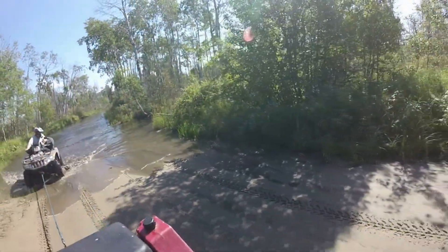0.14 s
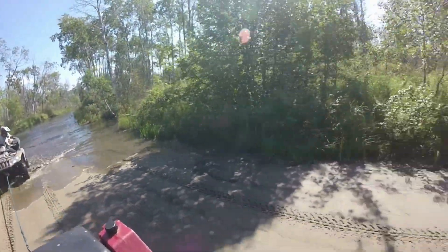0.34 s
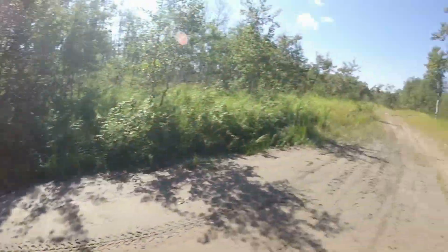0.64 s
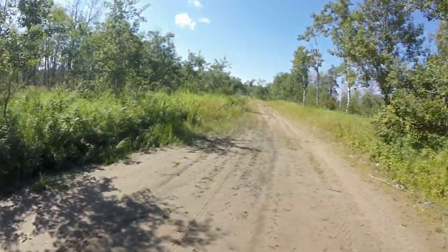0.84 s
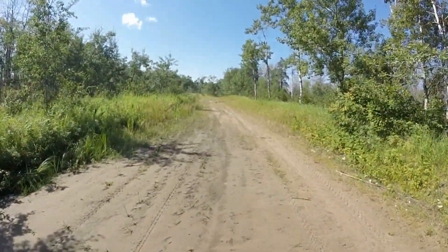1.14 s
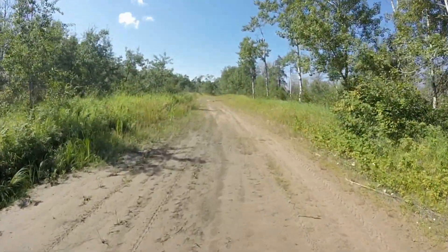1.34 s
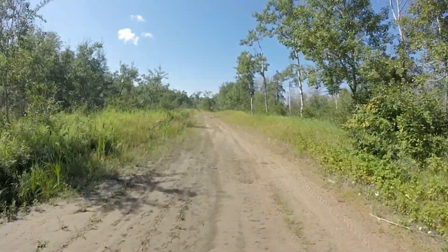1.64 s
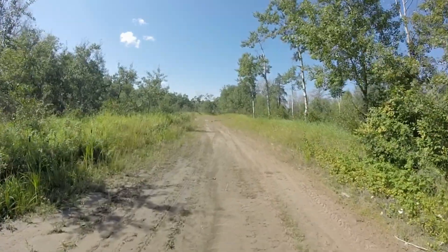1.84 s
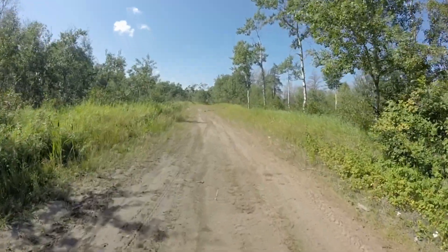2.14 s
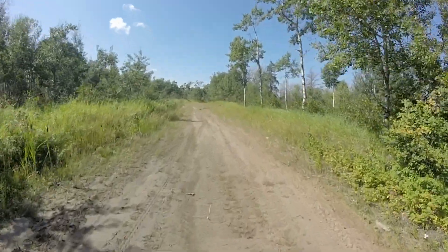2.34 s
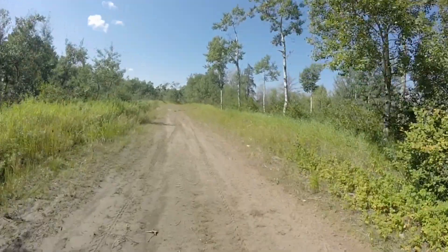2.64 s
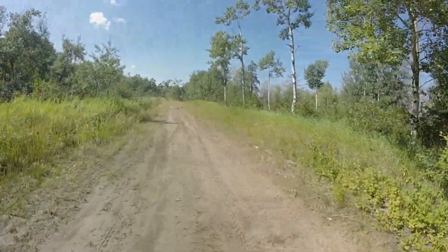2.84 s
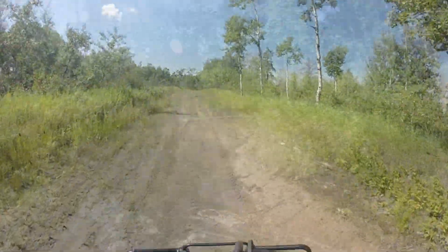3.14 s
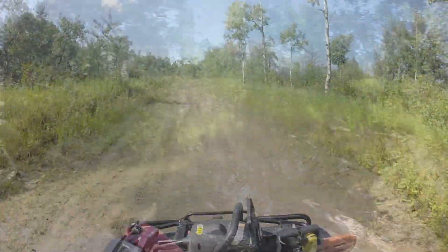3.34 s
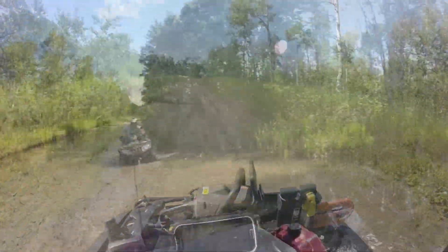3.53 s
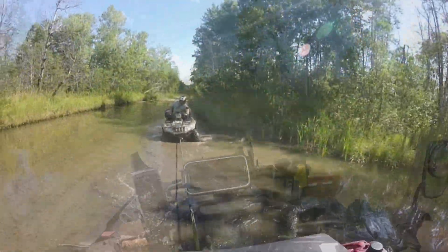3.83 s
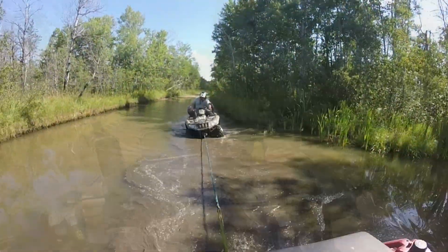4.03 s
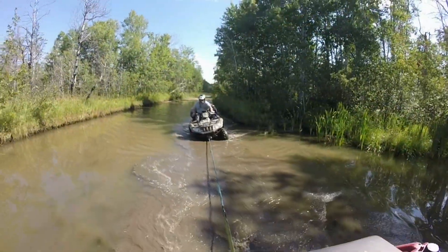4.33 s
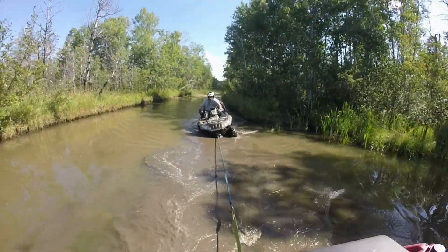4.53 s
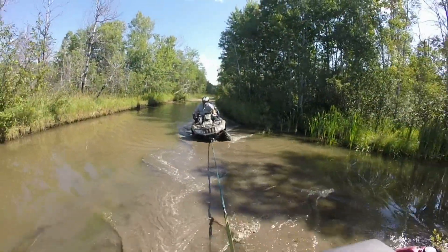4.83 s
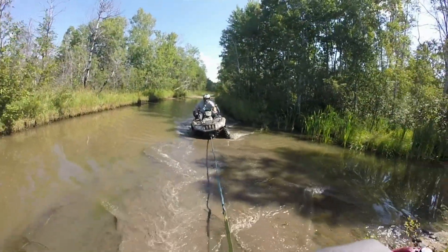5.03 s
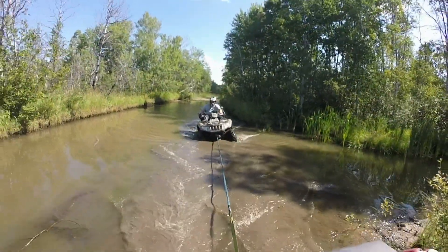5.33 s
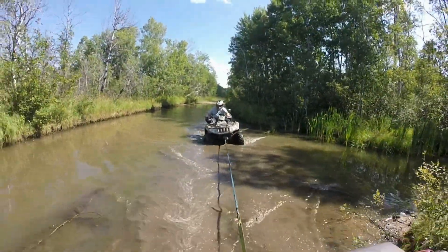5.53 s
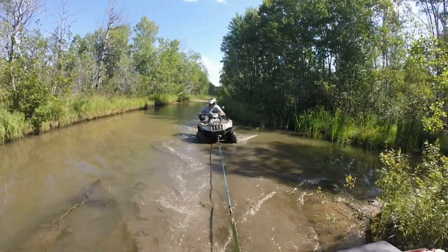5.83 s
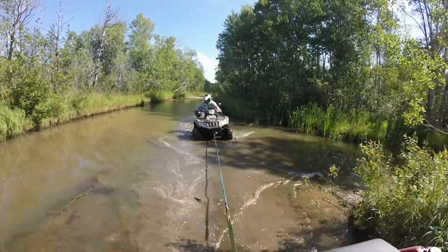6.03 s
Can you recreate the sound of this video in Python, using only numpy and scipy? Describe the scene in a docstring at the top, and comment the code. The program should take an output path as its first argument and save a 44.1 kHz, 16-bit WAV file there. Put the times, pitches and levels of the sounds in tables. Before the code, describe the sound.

Four-stroke off-road engine pulls and gathers speed with a faint whine, then its note sags into a deep, laboring low chug.

```python
"""An engine pulls and gathers speed, then its note sags away and a slower, heavy throb takes its place.
We are on board a four-stroke all-terrain vehicle, first on the trail, then towing through deep water.
The exhaust is a stack of tones on multiples of the firing rate, shaped by the resonances of the pipe.
Roar, clatter, rasp and hiss are coloured noise that swells with each firing; a low drone is ringing noise.
The drive whines on the trail, and in spells short clicks come once a firing."""
import sys
import numpy as np
from scipy import signal
from scipy.fft import rfft, irfft, next_fast_len
from scipy.io import wavfile
from scipy.ndimage import uniform_filter1d, minimum_filter1d

SR = 44100
rng = np.random.default_rng(int(sys.argv[2]) if len(sys.argv) > 2 else 0)


def log_audio(samples):
    """Write samples as a 16-bit WAV file to the path given in sys.argv[1]."""
    # one column per channel
    frames = np.atleast_2d(samples).T
    # limit to full scale, then quantise
    limited = np.clip(frames, -1, 1)
    pcm = np.round(limited * 32767).astype(np.int16)
    wavfile.write(sys.argv[1], SR, pcm)


N = 272331
TIME = np.arange(N) / SR   # seconds

# Engine speed on the trail and while towing. Each row: time in seconds, firings per second.
TRAIL_SPEED = [(0.0, 32.33), (0.14, 31.73), (0.77, 31.53), (1.66, 35.28), (1.95, 37.56), (2.15, 37.32),
               (2.31, 38.34), (3.01, 39.69), (3.31, 41.09), (3.52, 35.03), (3.8, 31.47)]
TOW_SPEED = [(3.75, 23.6), (4.22, 25.45), (4.88, 26.68), (5.28, 26.33), (5.62, 25.37), (6.18, 25.02)]
# How hard the engine works. Each row: time in seconds, effort from 0 to 1, strain in dB.
# Positive strain lifts the even multiples of the firing rate and lowers the odd ones.
TRAIL_WORK = [(0, 0.15, -1.5), (.5, 0.17, -3), (.8, 0.48, 1), (1.4, 0.45, 5.5), (2.2, 0.97, -1),
              (2.799, 0.99, -0.5), (3.3, 0.87, 4)]
TOW_WORK = [(3.8, 0, 1.8), (4.4, 0.7, 0.1), (5.1, 1, -1.5), (5.6, 0.87, 0.8), (6.18, 0.9, 2.3)]
STRAIN_FULL_ORDER = 8   # strain acts less on the multiples below this one
# Exhaust resonances. Each row: centre in Hz, width in Hz, relative level in dB at light effort,
# relative level in dB at full effort.
TRAIL_PIPE = [(40, 87.0, -24.0, -24.5), (125, 45, -19.5, -26.5), (145.6, 32.5, -29.5, -18.0),
              (220.7, 41, -21.5, -21.5), (281.3, 38, -24.5, -38.5), (303.5, 36.6, -40, -23.5),
              (372.5, 56, -34.5, -25.5), (465.3, 52.0, -37.0, -27.5), (557, 64, -34.0, -27.0),
              (680, 201.0, -53.5, -41)]
TOW_PIPE = [(28.6, 50, -30.5, -27.5), (123.4, 35.5, -17, -17.0), (177.2, 15, -43.0, -32.0),
            (256.2, 28, -30, -23.5), (275.7, 52.0, -34.5, -26), (350, 102.0, -40.5, -35.5)]
EXHAUST_LAG_CYCLES = 0.061   # on the trail the exhaust stroke follows the first rasp of the cycle

# The trail note fades away while the towing note comes in.
TRAIL_FADE_S, TRAIL_GONE_S = 2.97, 3.88
TOW_ENTERS_S, TOW_FULL_S = 3.04, 3.8
TRAIL_GAIN_DB, TOW_GAIN_DB = 0.22, 0.5

# Roar of the unsteady gas flow in the exhaust. Each row: time in seconds, level in dB.
ROAR_LEVEL = [(0, -33.5), (.8, -26.5), (1.3, -25.5), (2.4, -30.5), (3.3, -29), (3.7, -29), (4.2, -26.5),
              (5, -26.5), (6.18, -29)]
# Base for the clatter, before its offset. Each row: time in seconds, level in dB.
CLATTER_BASE = [(0.12, -28), (0.25, -29), (3.41, -30.5), (3.64, -31.5), (4.86, -27), (6.05, -29)]
# Shared base for rasp and hiss, before their offsets. Each row: time in seconds, level in dB.
TREBLE_BASE = [(0.15, -39), (0.52, -39.5), (1.89, -44.5), (3.29, -41.5), (3.54, -43.5), (4.53, -38.5),
               (5.84, -39.5), (5.98, -40), (6.0, -39)]
CLATTER_OFFSET_DB, RASP_OFFSET_DB, HISS_OFFSET_DB = 0.08, 0.3, -17.5

# Colours of the noises and of the clicks. Each row: frequency in Hz, relative strength in dB.
ROAR_COLOUR = [(15, -23.5), (33, 0), (65, -1), (130, -1), (200, -2), (290, -2.5), (400, 2.5), (490, 1.5),
               (570, 4), (650, 1), (760, -4), (1000, -53)]
CLATTER_COLOUR = [(480, -28.5), (620, -17.5), (710, -9.5), (800, 2), (950, 1.5), (1100, 5), (1210, 5.5),
                  (1300, -2), (1420, -9), (1700, -19)]
RASP_COLOUR = [(1100, -33.5), (1450, -2), (1700, -3), (2200, -2.5), (2600, -9), (3000, -14.5),
               (3400, -27.5), (4200, -45)]
HISS_COLOUR = [(2800, -16.5), (3400, -1.5), (3650, -1.5), (3900, -7), (4300, -7), (4900, -15.5),
               (5600, -11), (7000, -19.5), (9500, -22), (12000, -29), (14300, -27.5), (15500, -43)]
CLICK_COLOUR = [(1000, -14), (2500, -8.5), (5000, 3.5), (8000, -4.5), (10000, -8.5), (13000, -8),
                (15500, -13)]

# Whine of the drive. Each row: time in seconds, level in dB.
WHINE_LEVEL = [(0, -34), (.45, -34), (.8, -52), (1.5, -41), (1.9, -35), (2.5, -32), (2.9, -39),
               (3.3, -32.5), (3.7, -63)]
WHINE_ORDER = 28   # whine pitch as a multiple of the firing rate

# A hollow low drone swells faintly as the notes change over, then more strongly.
# Each row: time of the top in seconds, height in dB,
# time in seconds from the top until the swell is down to 37 percent.
DRONE_SWELLS = [(3.382, -33, 0.071), (4.172, -24, 0.15)]
DRONE_TOWING_DB = -38   # steady part that stays during the tow

# Spells of clicking. Each row: start in seconds, end in seconds,
# click strength in dB before the overall click gain and the colour.
CLICK_SPELLS = [(1.12, 1.53, -45.5), (1.65, 1.95, -46), (3.95, 4.34, -49), (4.35, 4.8, -55),
                (4.81, 5.03, -44.5), (5.07, 5.4, -49), (5.41, 6.0, -58), (6.01, 6.16, -46)]
TRAIL_CLICK_CYCLE, TOW_CLICK_CYCLE = 0.17, 0.014   # place of the click, as a part of the firing cycle

CUTOFF_HZ = 16000


def from_db(db):
    """Turn decibels into a gain."""
    return 10 ** (np.asarray(db) / 20)


def rms_one(x):
    """Scale a sound to an average power of 1."""
    return x / np.sqrt(np.mean(x ** 2) + 1e-20)


def in_time(rows):
    """Draw straight lines between the rows of a table and return each column at every sample."""
    seconds, *columns = np.transpose(rows)
    return [np.interp(TIME, seconds, column) for column in columns]


def ramp(start_s, end_s):
    """Rise in a straight line from 0 to 1."""
    return np.clip((TIME - start_s) / (end_s - start_s), 0, 1)


def drift(rate_hz):
    """Wander slowly at random around 0 with a spread of 1; a higher rate wanders faster."""
    step = 40   # the wander is made at every 40th sample, then joined by straight lines
    settle = 2000   # opening points dropped while the smoothing settles
    r = np.exp(-2 * np.pi * rate_hz * step / SR)
    noise = rng.standard_normal(N // step + 2 + settle)
    slow = signal.lfilter([1], [1, -2 * r, r * r], noise)[settle:]
    return np.interp(np.arange(N) / step, np.arange(len(slow)), rms_one(slow))


def coloured(x, colour):
    """Give a sound a smooth spectrum, falling steeply outside the table's first and last frequency."""
    size = next_fast_len(N + SR // 10)
    hz = np.maximum(np.arange(size // 2 + 1) * SR / size, 1)
    points_hz, level_db = np.transpose(colour)
    beyond = np.maximum(hz / points_hz[-1], 1) * np.maximum(points_hz[0] / hz, 1)
    gain = from_db(np.interp(np.log(hz), np.log(points_hz), level_db)) / beyond ** 4
    return irfft(rfft(x, size) * gain, size)[:N]


def resonance(x, hz, width_hz):
    """Ring at one frequency, as a two-pole filter with gain 1 at its top."""
    r = np.exp(-np.pi * width_hz / SR)
    feed = np.array([1, 0, -1]) * (1 - r * r) / 2
    ring = [1, -2 * r * np.cos(2 * np.pi * hz / SR), r * r]
    return signal.lfilter(feed, ring, x)


def crank(speed, fires_at, wobble):
    """Return the firing rate and a running count of firing cycles, made slightly uneven by a wander."""
    rate_hz, = in_time(speed)
    cycles = np.cumsum(rate_hz) / SR - fires_at + wobble * drift(7)
    return rate_hz, cycles


def stroke_times(cycles, place):
    """Find the moments in seconds at which the engine passes one place in its cycle."""
    passed = np.diff(np.floor(cycles - place)) > 0
    return TIME[1:][passed]


def burst(cycles, centre, width, depth, uneven_db):
    """Shape a loudness curve that jumps up and dies away each cycle, every time with its own strength."""
    since = (cycles - centre) % 1
    stroke = np.floor(cycles - centre).astype(int)
    strength = from_db(uneven_db * rng.standard_normal(SR // 10))[stroke]
    bump = since / width * np.exp(1 - since / width)
    return rms_one(1 + depth * strength * bump)


def stroke_clicks(strokes, level_db, uneven_db, second_s, second_db):
    """Click on every stroke of a spell: one pulse of its own strength, then a usually weaker opposite one."""
    pulses = np.zeros(N)
    clicks = [(s, db) for start, end, db in CLICK_SPELLS for s in strokes if start <= s <= end]
    chances = rng.standard_normal((len(clicks), 3))
    for (s, db), (hard, late, soft) in zip(clicks, chances):
        pulses[int(s * SR)] += from_db(db + uneven_db * hard)
        second_at = int((s + second_s * (1 + 0.12 * late)) * SR)
        pulses[min(second_at, N - 1)] -= from_db(db + second_db + 3 * soft)
    return from_db(level_db) * coloured(pulses, CLICK_COLOUR)


def hollow_drone(swell, hz, width_hz):
    """Let gusts of gas, made of pulsing noise, ring one low resonance."""
    level = from_db(DRONE_TOWING_DB) * ramp(TOW_ENTERS_S, TOW_FULL_S)
    for top_s, db, fall_s in DRONE_SWELLS:
        level = level + from_db(db) * np.exp(-((TIME - top_s) / fall_s) ** 2)
    gusts = rng.standard_normal(N) * swell
    ringing = resonance(resonance(gusts, hz, width_hz), hz, width_hz)
    return level * rms_one(ringing)


def drive_whine(cycles):
    """Sing a gear tone tied to engine speed, roughened by random wander and shaken by each firing."""
    level_db, = in_time(WHINE_LEVEL)
    tone = np.sin(2 * np.pi * WHINE_ORDER * cycles + 0.79 * drift(16))
    roughness = 1 + 0.33 * drift(25)
    shake = 1 + 0.12 * np.cos(2 * np.pi * (cycles - 0.5))
    return from_db(level_db) * rms_one(tone * roughness * shake)


def pulsing_noise(swell, colour, depth, grain_db):
    """Make coloured noise that swells with the firings; depth sets how much, grain_db adds a quick flicker."""
    grains = from_db(grain_db * drift(150))
    noise = rng.standard_normal(N) * swell ** depth * grains
    return rms_one(coloured(noise, colour))


def machine_noise(swell):
    """Add gas roar, valve clatter, rasp and hiss, all noise that pulses with the firings."""
    roar_db, = in_time(ROAR_LEVEL)
    clatter_db, = in_time(CLATTER_BASE)
    treble_db, = in_time(TREBLE_BASE)
    roar = pulsing_noise(swell, ROAR_COLOUR, depth=0.54, grain_db=0.0)
    clatter = pulsing_noise(swell, CLATTER_COLOUR, depth=1.0, grain_db=0.65)
    rasp = pulsing_noise(swell, RASP_COLOUR, depth=1.1, grain_db=1.0)
    hiss = pulsing_noise(swell, HISS_COLOUR, depth=0.8, grain_db=0.8)
    return (from_db(roar_db) * roar
            + from_db(clatter_db + CLATTER_OFFSET_DB) * clatter
            + from_db(treble_db + RASP_OFFSET_DB) * rasp
            + from_db(treble_db + HISS_OFFSET_DB) * hiss)


def pipe_gain(hz, effort, pipe):
    """Find how strongly the pipe's resonances, which grow or shrink with effort, carry a tone."""
    power = 0
    for centre_hz, width_hz, light_db, full_db in pipe:
        top = from_db(light_db + (full_db - light_db) * effort)
        power = power + top ** 2 / (1 + (2 * (hz - centre_hz) / width_hz) ** 2) ** 2
    return np.sqrt(power)


def exhaust(speed_hz, cycles, pipe, work, count, sweep_s_per_hz, boom_hz, boom_width_hz, rough, echo_s, scatter):
    """Glide multiples of the firing rate through the pipe's resonances; the high ones waver most."""
    effort, strain_db = in_time(work)
    sweep = np.interp(effort, np.linspace(0, 1, len(sweep_s_per_hz)), sweep_s_per_hz)
    pivot_hz = 290
    step = 100   # the pipe's gain is worked out at every 100th sample
    out = np.zeros(N)
    for k in range(1, count + 1):
        hz = k * speed_hz
        level = np.interp(TIME, TIME[::step], pipe_gain(hz[::step], effort[::step], pipe))
        # under strain a second beat grows halfway through the cycle and favours the even multiples
        level = level * from_db(strain_db * (-1) ** k * min(k / STRAIN_FULL_ORDER, 1))
        # pitches above the pivot sound later and those below it earlier, which spreads out each firing
        lag_turns = sweep * hz * (hz / 2 - pivot_hz)
        # a reflection off the body blurs the stroke
        lag_turns += scatter * np.sin(2 * np.pi * hz * echo_s)
        # the exhaust's boom rings on after each firing
        ringing = np.arctan(2 * (hz - boom_hz) / boom_width_hz)
        waver = rough * k / 10
        angle = 2 * np.pi * (k * cycles - lag_turns) - ringing + waver * drift(5.7)
        out += np.sqrt(2) * level * (1 + waver * drift(6.1)) * np.cos(angle)
    return out


def scene():
    """Let the trail run give way to the tow and add up all the sources."""
    trail_hz, trail_cycles = crank(TRAIL_SPEED, fires_at=-0.042, wobble=0.001)
    tow_hz, tow_cycles = crank(TOW_SPEED, fires_at=0.75, wobble=0.002)

    # clicks follow the trail engine first, then the towing engine
    trail_strokes = stroke_times(trail_cycles, TRAIL_CLICK_CYCLE)
    tow_strokes = stroke_times(tow_cycles, TOW_CLICK_CYCLE)
    strokes = np.r_[trail_strokes[trail_strokes < TOW_FULL_S], tow_strokes[tow_strokes >= TOW_FULL_S]]
    clicks = stroke_clicks(strokes, level_db=13.5, uneven_db=2.5, second_s=0.0042, second_db=-9.0)

    # the bursts of mechanical noise pass from one beat to the other
    towing = ramp(3.3, 4.87)
    trail_swell = burst(trail_cycles, centre=0.028, width=0.19, depth=0.38, uneven_db=2.5)
    tow_swell = burst(tow_cycles, centre=-0.11, width=0.11, depth=1.5, uneven_db=1.0)
    swell = (1 - towing) * trail_swell + towing * tow_swell
    drone = hollow_drone(swell, hz=308, width_hz=81)
    whine = drive_whine(trail_cycles)
    noise = machine_noise(swell)

    # a quick, snarling note on the trail (turned upside down) and a slow boom in the water
    trail = -exhaust(trail_hz, trail_cycles - EXHAUST_LAG_CYCLES, TRAIL_PIPE, TRAIL_WORK, count=21,
                     sweep_s_per_hz=(1e-5, 3.5e-5, 4e-5), boom_hz=193, boom_width_hz=90,
                     rough=0.15, echo_s=0.00896, scatter=0.092)
    tow = exhaust(tow_hz, tow_cycles, TOW_PIPE, TOW_WORK, count=16,
                  sweep_s_per_hz=(2.5e-5, 1.8e-5), boom_hz=145, boom_width_hz=18,
                  rough=0.12, echo_s=0.009, scatter=0.058)
    trail_part = from_db(TRAIL_GAIN_DB) * (1 - ramp(TRAIL_FADE_S, TRAIL_GONE_S)) * trail
    tow_part = from_db(TOW_GAIN_DB) * ramp(TOW_ENTERS_S, TOW_FULL_S) * tow
    return (clicks + drone + whine + noise + trail_part + tow_part)[None]


def record(dry):
    """Hold the highest peaks down with a limiter, ease both ends and cut the top of the treble."""
    ceiling = 0.53
    reach = SR // 200   # samples in 5 ms
    gain = minimum_filter1d(np.minimum(1, ceiling / (np.abs(dry) + 1e-9)), 2 * reach)
    smooth_gain = uniform_filter1d(uniform_filter1d(gain, reach), reach)
    ease = np.clip(np.minimum(TIME, TIME[-1] - TIME) / 0.004, 0, 1)   # 4 ms at each end
    low_pass = signal.cheby2(16, 60, CUTOFF_HZ, fs=SR, output="sos")
    return signal.sosfilt(low_pass, dry * smooth_gain * ease)


dry = scene()
out = record(dry)
log_audio(out)
```